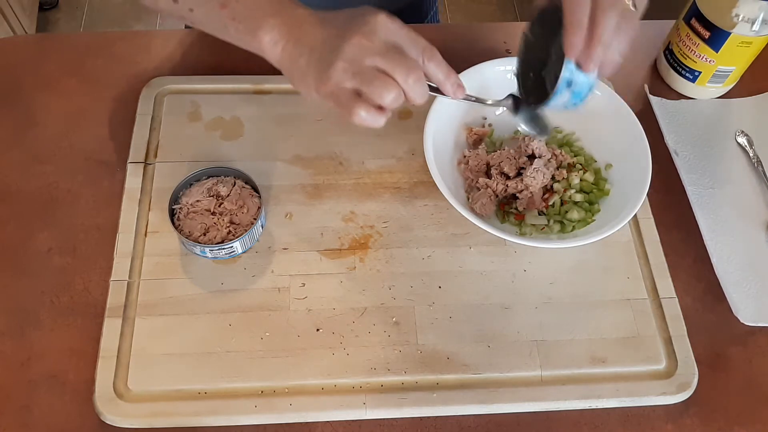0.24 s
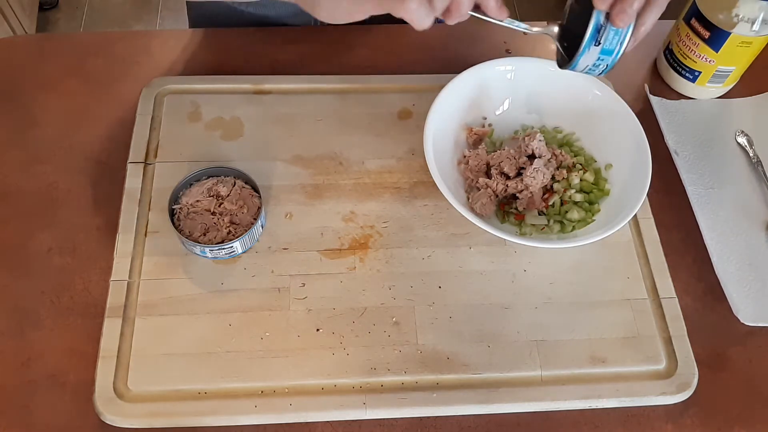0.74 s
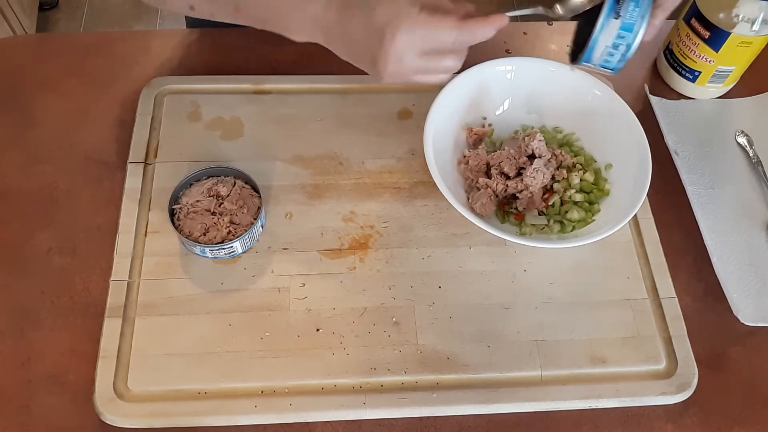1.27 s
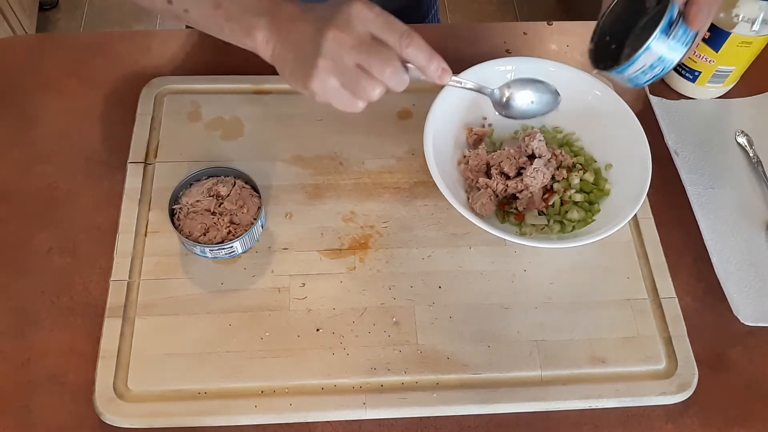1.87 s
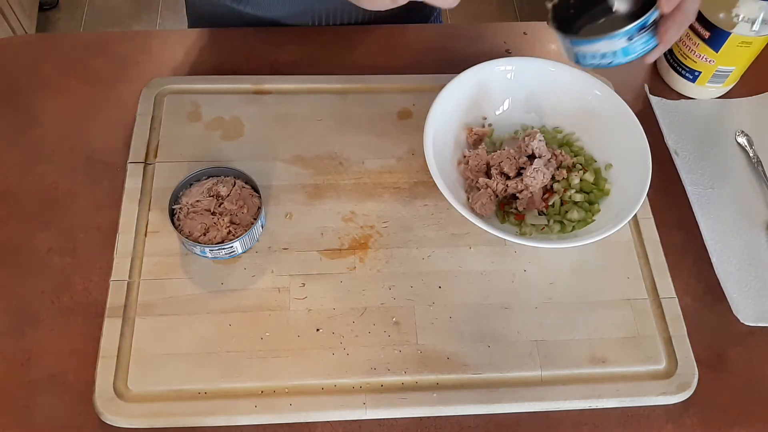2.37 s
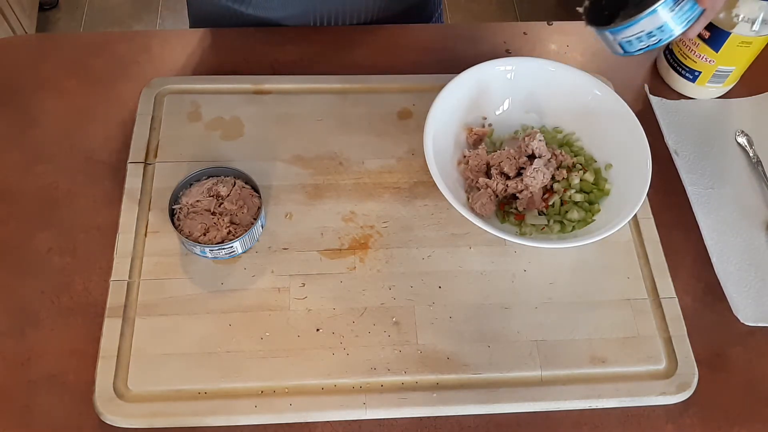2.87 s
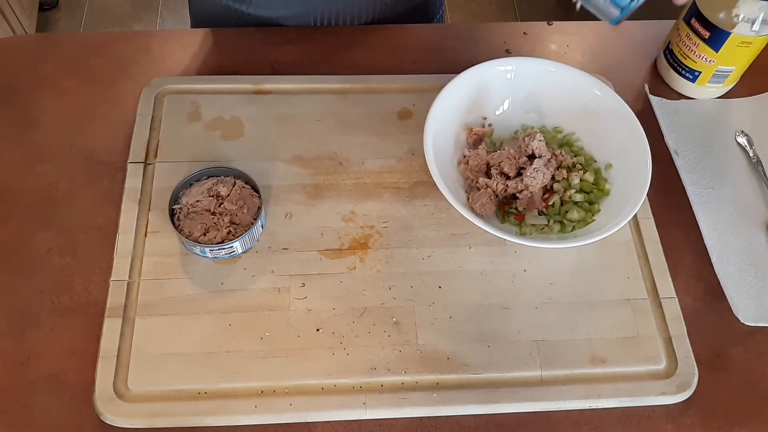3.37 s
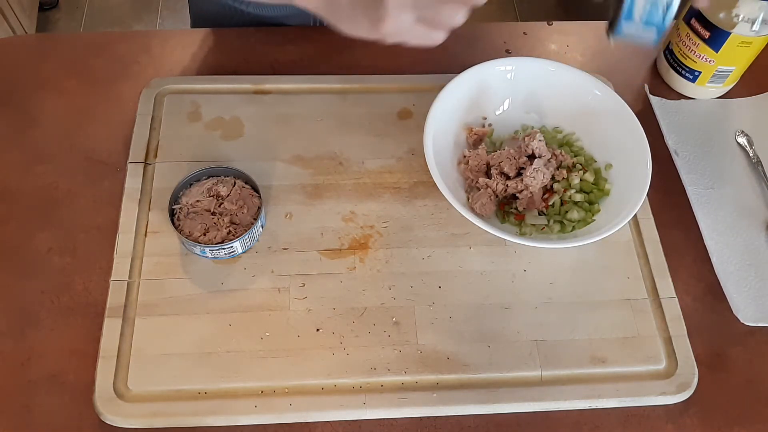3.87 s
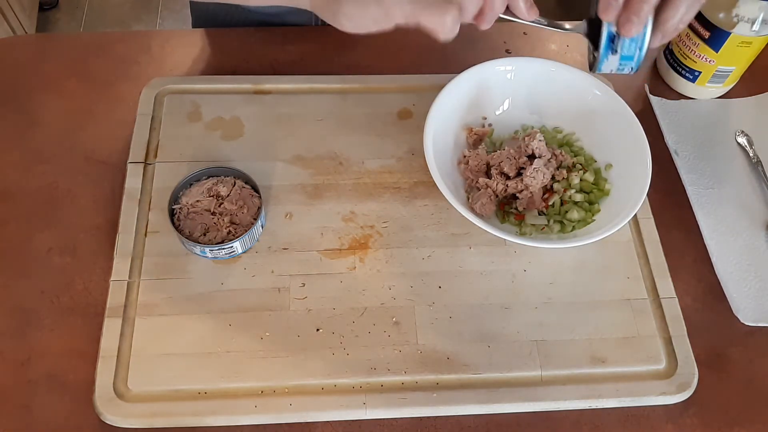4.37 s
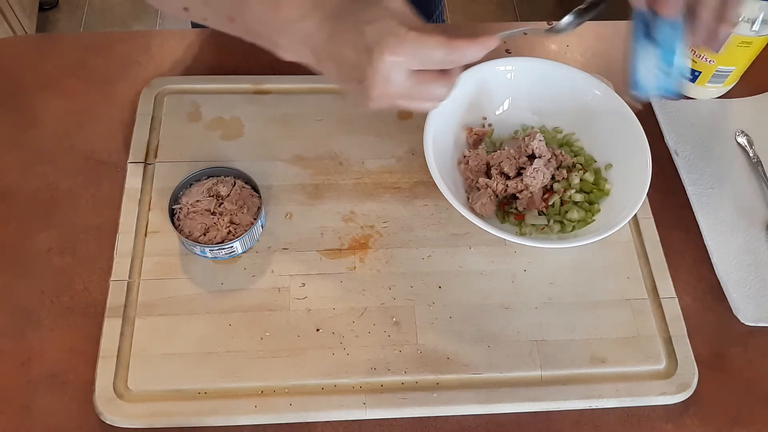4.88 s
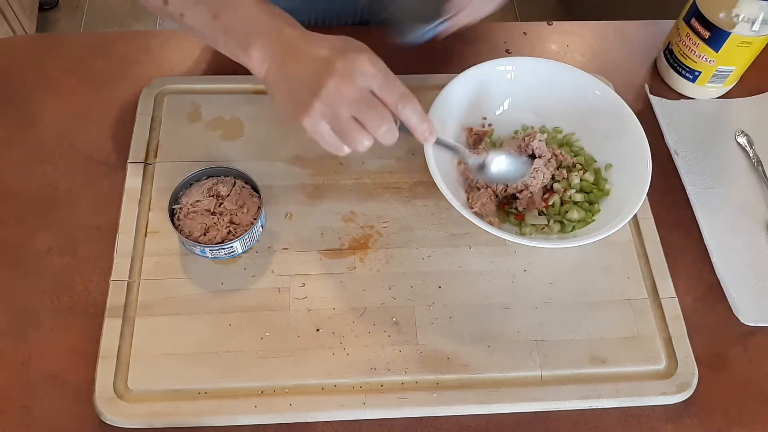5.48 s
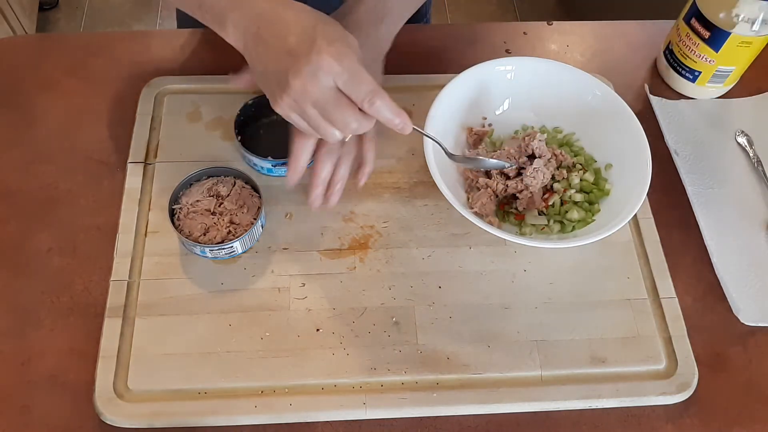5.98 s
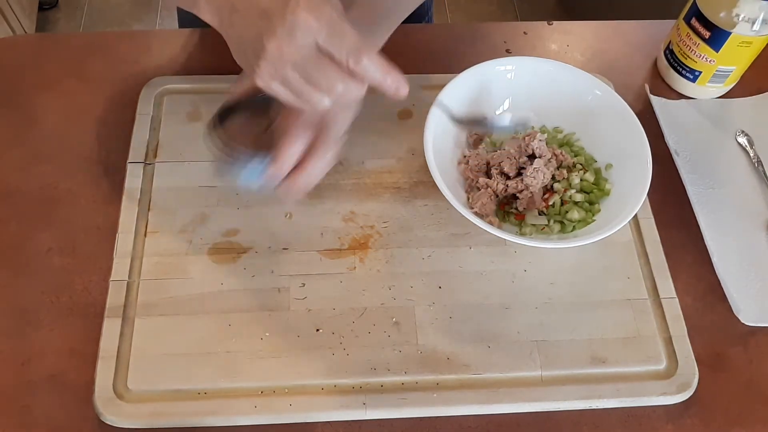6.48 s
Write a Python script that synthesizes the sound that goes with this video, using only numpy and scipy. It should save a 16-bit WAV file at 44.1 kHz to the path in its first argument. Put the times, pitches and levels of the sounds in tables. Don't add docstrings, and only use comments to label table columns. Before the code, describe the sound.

A quiet kitchen with low fridge hum, soft rumble and hiss, picked up close in stereo, the action slightly right. The tail of an earlier clink hangs at the start. A bright spoon clink comes at 0.2 s, then a cluster of duller tin knocks at 0.55-0.6. Faint rustle and a light scrape slide out over the rim around 0.9-1.25. After a pause, taps with short gritty scrapes at 2.3-2.5, a rim tap and slide at 2.75-2.85, then a loud hit at 3.1, another knock at 3.33 and a pair at 3.78. A sharp scrape and clinks come at 4.1-4.2, weaker scraping at 4.5-4.8. Soft shuffling and tiny wet ticks follow at 5.1-5.3. The can's edge touches a wooden board at 5.75, lands with a hollow clunk at 5.86, and bounces and settles by 5.92. Only faint rustles remain from 6.15 to the end.

```python
import sys
import numpy as np
from scipy import signal
from scipy.fft import rfft, irfft, next_fast_len
from scipy.io import wavfile

SR = 44100
rng = np.random.default_rng(int(sys.argv[2]) if len(sys.argv) > 2 else 0)


def gain_from_decibels(decibels):
    exponent = np.asarray(decibels, float) / 20
    return 10 ** exponent


def dump(signal):
    limited = np.clip(np.atleast_2d(signal).T, -1, 1)
    pcm = np.round(limited * 32767).astype(np.int16)
    wavfile.write(sys.argv[1], SR, pcm)


N = 296793
LEAD = SR // 5


def at_hz(points, hz):
    points = np.array(points)
    return np.interp(np.log(np.maximum(hz, 1)), np.log(points[:, 0]), points[:, 1])


def rms_one(x):
    return x / np.sqrt(np.mean(x ** 2) + 1e-20)


def band(x, low_hz, high_hz, order=2):
    return signal.sosfilt(signal.butter(order, [low_hz, high_hz], "band", fs=SR, output="sos"), x)


def two_ports(mid, side, alike):
    alike = np.clip(alike, 0, 1)
    return np.sqrt(1 + alike) * mid + np.sqrt(1 - alike) * side * [[1], [-1]]


# pitch_hz [Hz], level_db [dB per Hz]
AIR = [(12, -52), (20, -13.5), (63, -14.5), (102, -15.5), (124, -11), (156, -4), (184, -11.5), (258, -5),
       (314, -15), (440, -10.5), (551, -16.5), (1430, -31), (8890, -31.5), (15200, -26.5), (16500, -51)]
AIR_DB = -64.5
# pitch_hz [Hz], likeness [1 = same]
LIKENESS = [(60, -0.03), (180, 0.5), (550, 0.2), (1650, 3), (4970, -0.5), (15000, -0.6)]
# pitch_hz [Hz], level_db [dB rms]
HUM = [(59.2, -82), (107.7, -73), (258.4, -76), (441.4, -86.5)]


def background():
    hz, t = np.arange(N // 2 + 1) * SR / N, np.arange(N) / SR
    mid, side = rfft(rng.standard_normal((2, N))) * gain_from_decibels(at_hz(AIR, hz))
    out = gain_from_decibels(AIR_DB - 4) * rms_one(irfft(two_ports(mid, side, at_hz(LIKENESS, hz)), N))
    slow = signal.butter(2, 4, fs=SR, output="sos")
    for line_hz, level_db in HUM:
        waver = rms_one(signal.sosfiltfilt(slow, rng.standard_normal(N + SR))[SR // 2:][:N])
        phase = 2 * np.pi * line_hz * t + 1.3 * np.roll(waver, SR)
        tone = gain_from_decibels(level_db + 5.5 + 1.4 * waver) * np.sin(phase)
        out += tone * gain_from_decibels(np.array([[1.6], [-1.6]]))
    return out


# pitch_hz [Hz], t60_s [s]
KITCHEN = [(300, 0.45), (750, 0.28), (1500, 0.38), (3000, 0.31), (7000, 0.36), (14000, 0.27)]
KITCHEN_DB, FIRST_ECHO_S = -4.5, 0.00047


def kitchen():
    t = np.arange(SR // 2) / SR
    edges_hz = 100 * 2 ** np.arange(0, 7.6, .5)
    white, tail = rng.standard_normal((2, 2, len(t))), 0
    for k, (low, high) in enumerate(zip(edges_hz, edges_hz[1:])):
        centre_hz = np.sqrt(low * high)
        mid, side = band(white[k % 2], low, high)
        pair = two_ports(mid, side, at_hz([(500, .9), (1200, .7), (3000, 0)], centre_hz))
        tail = tail + pair * gain_from_decibels(-60 * t / at_hz(KITCHEN, centre_hz))
    tail = tail * np.clip(t / FIRST_ECHO_S - .5, 0, 1)
    response = gain_from_decibels(KITCHEN_DB) * tail / np.sqrt(np.sum(tail ** 2) / 2)
    response[0, 4] += 1
    response[1, 0] += 1
    return response


# pitch_hz [Hz], left_minus_right_db [dB]
PORTS = [(60, 1), (200, 6), (600, 1), (1400, -1.5), (3000, 1.5), (5000, -7.5), (8000, -5.5), (11000, -8.5),
         (14500, -23)]


def at_ports(x):
    size = 2 * next_fast_len((len(x) + SR) // 2)
    half_db = at_hz(PORTS, np.arange(size // 2 + 1) * SR / size) / 2
    cepstrum = irfft(np.log(gain_from_decibels(half_db)), size)
    cepstrum[1:size // 2] *= 2
    cepstrum[size // 2 + 1:] = 0
    shade = np.exp(rfft(cepstrum) * [[1], [-1]])
    return irfft(rfft(x, size) * rfft(kitchen(), size) * shade, size)[:, LEAD:LEAD + N]


def grit(per_s, spread_db):
    size_db = spread_db * np.minimum(rng.exponential(1, N), 3.5)
    sizes = gain_from_decibels(size_db) * rng.choice([-1, 1], N)
    return rms_one(sizes * (rng.random(N) < per_s / SR))


PRESS_DB_PER_S, LIFT_DB_PER_S, SLIDE_OFF_DB_PER_S, SETTLE_DB_PER_S = 2999.5, 447.5, 327.5, 291


def strokes(table, release_db_per_s):
    t = np.arange(N) / SR
    s, length, first_db, last_db, extra = np.transpose(table)[:, :, None]
    held_db = first_db + (last_db - first_db) * np.clip((t - s) / length, 0, 1)
    onset_db = PRESS_DB_PER_S * np.maximum(s - t, 0)
    release_db = release_db_per_s * np.maximum(t - s - length, 0)
    return gain_from_decibels(held_db - onset_db - release_db), extra[:, 0]


# start_s [s], length_s [s], first_db [dB], last_db [dB], brushing_over_shuffle_db [dB]
RUSTLE = [
    (0.9, 0.034, -72, -88, -7),
    (1.06, 0.072, -72.5, -70, -.5),
    (2.14, 0.16, -89, -75, -2),
    (5.1, 0.16, -88, -72.5, -14),
    (5.27, 0.24, -79.5, -83.5, -13.5),
    (6.15, 0.051, -70, -87, -4),
    (6.22, 0.042, -69, -72.5, -15),
    (6.4, 0.17, -92, -81, -1),
    (6.6, .13, -95, -95, 14),
]


def rustle():
    shuffle, brush_db = strokes(RUSTLE, SETTLE_DB_PER_S)
    low_gain, high_gain = shuffle.sum(axis=0), gain_from_decibels(brush_db) @ shuffle
    low = low_gain * rms_one(band(grit(560, 2.4), 390, 1900))
    return low + high_gain * rms_one(band(grit(3000, 1.6), 4900, 8000))


def ring(clicks, hz, t60):
    r, w = gain_from_decibels(-60 / (t60 * SR)), 2 * np.pi * hz / SR
    return signal.lfilter([0, np.sin(w)], [1, -2 * r * np.cos(w), r * r], clicks + 1e-18)


def resonate(clicks, modes):
    return sum(gain_from_decibels(db) * ring(clicks, hz, t60) for hz, db, t60 in modes)


# start_s [s], level_db [dB peak], pitch_hz [Hz], t60_s [s]
TICKS = [
    (5.1518, -56.5, 6100, 0.016),
    (5.2751, -54, 6800, 0.0091),
    (5.2769, -57, 8000, .006),
]


def ticks():
    out = np.zeros(N)
    for s, peak_db, hz, t60 in TICKS:
        click = np.zeros(N)
        click[round(s * SR)] = gain_from_decibels(peak_db)
        out += ring(click, hz, t60)
    return out


# start_s [s], length_s [s], first_db [dB], last_db [dB], height [0 base - 1 rim]
DRAG = [(0.94, 0.11, -73.5, -77, 0.35), (1.05, .08, -102, -61, 0.33), (2.33, 0.084, -42, -41, 0.32),
        (2.45, 0.057, -45.5, -47.5, 0.59), (2.745, 0.065, -47.5, -46.5, 0.64), (2.82, .045, -45, -51, .7),
        (3.05, 0.038, -37.5, -36, 0.77), (3.56, 0.069, -72, -62, .8), (4.09, .065, -42, -35.5, 0.64),
        (4.17, 0.044, -25.5, -49.5, 0.32), (4.47, 0.02, -71, -47.5, 0.69), (4.5, .04, -55, -86, 0.18),
        (4.54, 0.06, -68.5, -59, .8), (4.62, 0.12, -56, -70.5, 0.74)]
# start_s [s], length_s [s], first_db [dB], last_db [dB], edge_over_bowl_db [dB]
SLIDE = [
    (1.19, 0.069, -63.5, -49, 0),
    (1.24, 0.0062, -63, -41, -1.9),
    (2.815, 0.029, -56.5, -41.5, -3),
    (2.837, 0.018, -41, -55, -3.1),
    (4.77, 0.055, -61.5, -42.5, -2.8),
]
# mid_height_db [dB], change_base_to_rim_db [dB]
DRAG_REACH = [(-10, -23.5), (-2.5, -29.5), (1, -5.3), (-2.95, 12)]
# pitch_hz [Hz], level_db [dB], t60_s [s]
WALL_PRESSED = [(1888, 2.5, 0.091), (1800, -3, .035), (2320, -6.5, 0.024), (4020, -4, 0.075),
                (4700, -10.5, 0.029)]
# pitch_hz [Hz], level_db [dB], t60_s [s]
RIM_PRESSED = [(1740, -19, 0.0044), (2600, -17.5, 0.0045), (3360, -4, .005), (3800, 3.5, 0.005),
               (4500, -0.5, 0.0053), (5160, -1.5, 0.0043)]
# pitch_hz [Hz], level_db [dB], t60_s [s]
EDGE_PRESSED = [(7140, 0.5, 0.0023), (8460, 2, 0.006), (7480, -6, 0.018), (8800, -9.5, 0.01),
                (10200, 6, 0.0011), (11600, -3.5, 0.0052), (14000, -6.5, .0015)]
# pitch_hz [Hz], level_db [dB], t60_s [s]
SPOON_SLIDING = [(1647, -22, 0.0035), (2467, -7, 0.00043), (3120, 5.5, 0.0046), (3880, -3, .003),
                 (4180, 10, 0.0083)]


def drag():
    out = np.zeros(N)
    clumps = gain_from_decibels(1.8 * rms_one(band(rng.standard_normal(N), 28, 120)))
    # (modes, slips per s, lowest Hz radiated, share of clumping)
    bodies = ((CAN[:3], 900, 280, .9), (WALL_PRESSED, 1500, 1100, .9), (RIM_PRESSED, 2500, 1300, .9),
              (EDGE_PRESSED, 4000, 5000, .9), (SPOON_SLIDING, 4000, 1200, .3), (EDGE_PRESSED, 5000, 5500, .3))
    pressure, place = strokes(DRAG, LIFT_DB_PER_S)
    sliding, edge_db = strokes(SLIDE, SLIDE_OFF_DB_PER_S)
    drive = [gain_from_decibels(mid_db + change_db * (place - .5)) @ pressure for mid_db, change_db in DRAG_REACH]
    drive += [sliding.sum(axis=0), gain_from_decibels(edge_db) @ sliding]
    for gain, (modes, per_s, low_hz, share) in zip(drive, bodies):
        slips = clumps ** share * grit(per_s, 2.8)
        scale = np.std(resonate(slips[:SR], modes))
        out += gain_from_decibels(-3.0) / scale * band(resonate(gain * slips, modes), low_hz, 16000)
    return out


ZONES_HZ = [700, 2100, 4600, 10000]
# pitch_hz [Hz], t60_s [s]
GRIP = [(700, .15), (2000, .09), (4000, .04), (12000, .025)]
# pitch_hz [Hz], level_db [dB]
CLATTER = [(450, -2), (1000, -8), (2500, -2), (8000, -5), (15500, 0.5)]
CLATTER_DAMPING = .35


def blows(table, modes, ring_db, clatter_db, clatter_t60, upper_db, split=0.011, held=True):
    out, t = np.zeros(N + SR), np.arange(SR // 4) / SR
    hz, level_db, t60 = np.transpose(modes)
    t60 = np.minimum(t60, at_hz(GRIP, hz)) if held else t60
    count = len(hz)
    luck = rng.standard_normal((len(table), 3, 2 * count + 170))
    small_hz = np.geomspace(560, 15500, 170)
    small_t60 = clatter_t60 * (2000 / small_hz) ** CLATTER_DAMPING
    level_db = np.concatenate([level_db + ring_db, level_db + ring_db, clatter_db + at_hz(CLATTER, small_hz)])
    t60 = np.concatenate([t60, t60, small_t60])
    spread = np.concatenate([np.full(count, .005), np.full(count + 170, split)])
    hz = np.concatenate([hz, hz, small_hz])
    decay = np.exp(-np.log(1000) * t / t60[:, None])
    octaves_up = np.log2(np.maximum(ZONES_HZ, ZONES_HZ[1]) / ZONES_HZ[1])
    for (s, peak_db, base_db, hard_db), (shift, strength, phase) in zip(table, luck):
        zones_db = hard_db * octaves_up + [base_db, 0, upper_db, 0]
        colour_db = at_hz(np.transpose([ZONES_HZ, zones_db]), hz)
        height = gain_from_decibels(peak_db + colour_db + level_db + 1.8 * strength)
        phase[:3] = 0
        phase[count:2 * count] = phase[:count]
        shifted_hz = hz * (1 + spread * shift)
        sound = height @ (decay * np.sin(2 * np.pi * (shifted_hz[:, None] * t + phase[:, None])))
        at = round(s * SR) + LEAD
        out[at:at + len(t)] += sound * np.minimum(t / 0.00057, 1)
    return out[:N + LEAD]


# start_s [s], level_db [dB], base_db [dB], hardness_db [dB per octave]
TOUCHDOWN = [
    (5.744, -27, 9, -10.5),
    (5.75, -30, 2.2, -7),
    (5.803, -42, 16, -7),
]
# pitch_hz [Hz], level_db [dB], t60_s [s]
CAN_TILTED = [(217, -34, 0.049), (288, -27.5, 0.033), (703, -5, 0.08), (1000, -4, .04), (1380, -2.5, 0.026),
              (1871, 0.5, 0.17), (2437, -9.5, 0.023), (3960, 2.5, 0.046), (4910, 1, 0.04),
              (6800, -6, 0.044)]


def touchdown():
    sound = blows(TOUCHDOWN, CAN_TILTED, ring_db=-0.5, clatter_db=-6, clatter_t60=0.022, upper_db=2.8)
    return band(sound, 630, 12000)


# start_s [s], level_db [dB], base_db [dB], hardness_db [dB per octave]
BOARD_BLOWS = [
    (5.857, -9.5, -12, -7),
    (5.864, -24, -11, -4.3),
    (5.9, -19.5, -9.5, -5),
    (5.917, -34, -11, -28),
]
# pitch_hz [Hz], level_db [dB], t60_s [s]
CAN_ON_BOARD = [(200, -19, 0.05), (314.6, -14.5, 0.031), (738, -8, 0.24), (795, 4, 0.065),
                (900, 9.5, 0.013), (1064, -3, 0.052), (1748, -7, 0.15), (1658, -2, 0.05), (2397, -9, 0.065),
                (3287, -1.5, 0.03), (3750, -3.5, 0.03), (4890, -11.5, 0.14), (6570, -3.5, 0.021),
                (9250, -24, 0.014)]


def board_blows():
    sound = blows(BOARD_BLOWS, CAN_ON_BOARD, ring_db=-7.0, clatter_db=-9.5, clatter_t60=0.022,
                  upper_db=-1.5, held=False)
    return band(sound, 330, 7400)


# start_s [s], level_db [dB], base_db [dB], hardness_db [dB per octave]
CLINK = [
    (-.11, -26, -33.5, 5),
    (.2205, -27, -5.5, 7.5),
]
# pitch_hz [Hz], level_db [dB], t60_s [s]
SPOON_EDGE = [(1104, -2.5, 0.05), (1820, 0.5, 0.016), (2540, -11, 0.054), (3470, -14.5, 0.033),
              (4840, -6.5, 0.006), (5170, 14, .005), (5550, -7, 0.01), (7900, -20.5, 0.018),
              (8600, -3, 0.02), (8900, 4, 0.0026), (9580, -7, 0.017), (10070, -9, 0.018),
              (12700, 3.5, .004), (12600, -14, 0.006)]


def clink():
    return blows(CLINK, SPOON_EDGE, ring_db=-6.5, clatter_db=-13.5, clatter_t60=0.023, upper_db=12, split=0.01)


# start_s [s], level_db [dB], base_db [dB], hardness_db [dB per octave]
RIM_BLOWS = [
    (2.7368, -39.5, -18, 1),
    (3.044, -41.5, -16.5, -4.1),
    (3.5857, -87.5, 16, -1),
    (4.0844, -40, -9.5, 4.5),
    (4.805, -57.5, -33, 0.5),
    (4.8262, -51, -35, 2),
]
# pitch_hz [Hz], level_db [dB], t60_s [s]
RIM = [(690, 2, 0.042), (1126, -2.5, 0.12), (1870, -8.5, 0.058), (2410, -10.5, 0.09), (3580, 0, 0.013),
       (4390, -3, 0.021), (6940, -9.5, .025), (6260, -10.5, 0.025), (8800, 5, 0.054), (8482, -14, 0.057),
       (8300, -4.5, 0.0067), (10930, -4.5, 0.014), (13400, -12, 0.0085)]


def rim_blows():
    return blows(RIM_BLOWS, RIM, ring_db=1.5, clatter_db=-12, clatter_t60=0.042, upper_db=18)


# start_s [s], level_db [dB], base_db [dB], hardness_db [dB per octave]
SOFT_KNOCKS = [
    (-.03, -35, -27, -16.5),
    (0.544, -25, 9, -11),
    (0.58, -26.5, -2.5, -4.5),
    (0.596, -37, -13, 3),
]
# pitch_hz [Hz], level_db [dB], t60_s [s]
CAN_PRESSED = [(819, -6.5, 0.16), (1264, -9, 0.076), (1803, 0, 0.14), (2550, -2, 0.017), (4000, -17, 0.012),
               (5750, -11, 0.019), (7360, -11, .03)]


def soft_knocks():
    sound = blows(SOFT_KNOCKS, CAN_PRESSED, ring_db=-12, clatter_db=-26.5, clatter_t60=0.024, upper_db=13.5)
    return band(sound, 650, 15000)


# start_s [s], level_db [dB], base_db [dB, share of the base], hardness_db [dB per octave above wall]
CAN_BLOWS = [(0.614, -19, -4.5, -0.5), (2.316, -24, 7.5, 5), (2.439, -33.5, 1, -.4),
             (3.082, -24.5, 10, 4.5), (3.093, -8, -31.5, -17.5), (3.329, -19.5, -6, .6),
             (3.351, -38.5, 14.5, -9.5), (3.75, -35, -8, -7.5), (3.775, -18, -6, -2.5),
             (3.788, -22, 0.3, 2), (4.169, -29, -18, 0.6), (4.189, -31.5, 8, -17), (4.213, -27.5, 4, 1)]
# pitch_hz [Hz], level_db [dB], t60_s [s]
CAN = [(387, -18, 0.11), (700.8, -2, 0.11), (1126, 3, 0.012), (1450, -16.5, 0.04), (1893, -0.5, 0.14),
       (2531, -1.5, 0.14), (2616, -5.5, 0.022), (3290, -3.5, 0.04), (4020, -0.5, 0.03), (4968, -5, 0.034),
       (5550, -11.5, 0.084), (6525, -3, 0.036), (6800, -7, 0.079), (7520, -4, 0.0086), (8430, -5, 0.015),
       (9440, -9.5, 0.081), (10000, -17.5, .02), (10460, -9.5, 0.075), (11300, -4.5, 0.058)]


def can_blows():
    return blows(CAN_BLOWS, CAN, ring_db=-8.5, clatter_db=-21.5, clatter_t60=0.062, upper_db=9.5)


def scene():
    near = np.append(np.zeros(LEAD), rustle() + ticks() + drag())
    near += touchdown() + board_blows()
    near += clink() + rim_blows() + soft_knocks() + can_blows()
    return background() + at_ports(band(near, 140, 15300, order=4))


def roll_off(x):
    return signal.sosfilt(signal.butter(12, 16830, fs=SR, output="sos"), x)


def record(dry):
    rounded = 0.74 * np.tanh(dry / 0.92)
    mix = signal.sosfilt(signal.cheby2(10, 50, 16400, fs=SR, output="sos"), rounded)
    return roll_off(mix)


dry = scene()
out = record(dry)
dump(out)
```